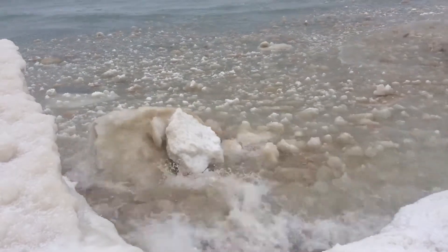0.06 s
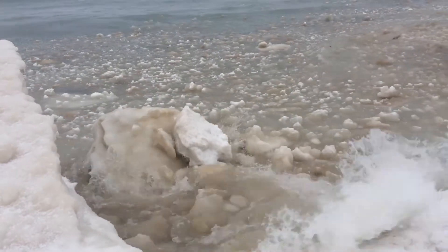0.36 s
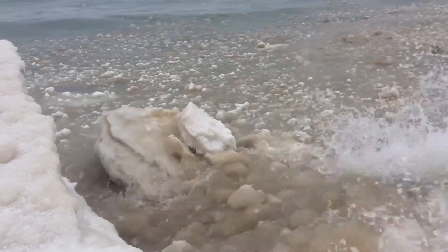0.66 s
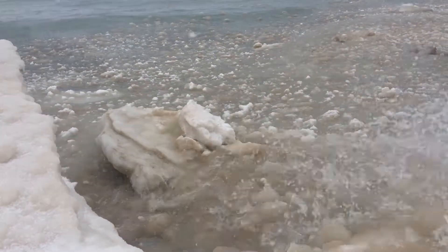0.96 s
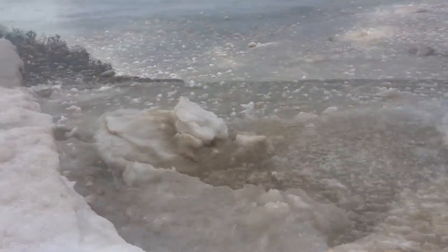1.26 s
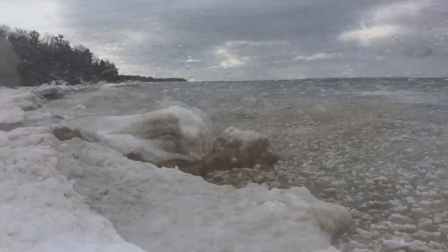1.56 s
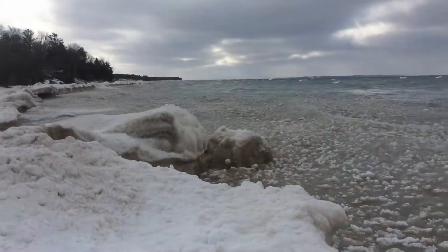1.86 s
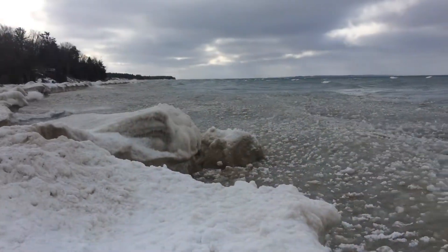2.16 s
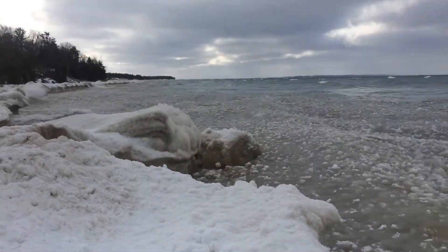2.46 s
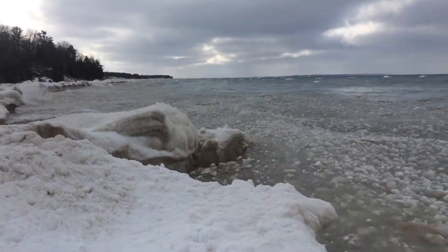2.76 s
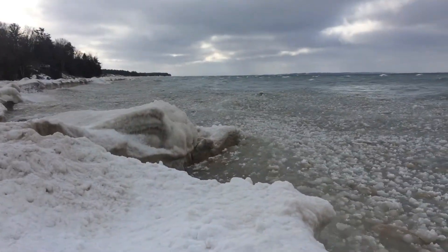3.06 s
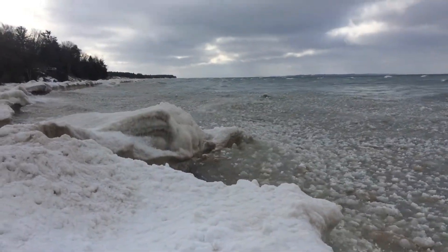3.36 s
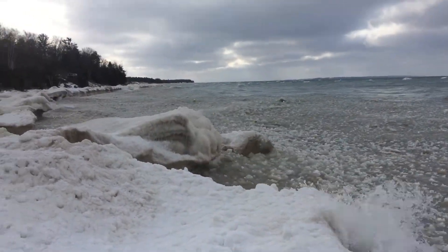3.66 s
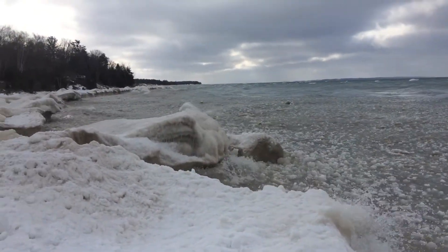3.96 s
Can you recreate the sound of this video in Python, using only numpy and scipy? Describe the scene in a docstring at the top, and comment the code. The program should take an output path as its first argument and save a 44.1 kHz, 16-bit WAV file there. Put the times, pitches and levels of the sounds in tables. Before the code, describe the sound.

A slushy wave breaks and splashes against ice, then wind buffets the microphone over softer surf.

```python
"""Slushy wave on an ice shelf

A wave breaks right below a hand-held microphone: bubbles churn, slush slaps and spray rains back.
It dies away to a duller wash from the open shore, with small splashes and fizz at the ice edge.
Gusts buffet the microphone, and a narrow, drifting dip hollows out the water's sound. Mono."""
import sys
import numpy as np
from scipy import signal
from scipy.fft import rfft, irfft
from scipy.io import wavfile
from scipy.ndimage import uniform_filter1d

SR = 44100
rng = np.random.default_rng(int(sys.argv[2]) if len(sys.argv) > 2 else 0)


def dump(signal):
    """Clip the signal to [-1, 1] and save it as 16-bit WAV at the path in sys.argv[1]."""
    limited = np.clip(np.atleast_2d(signal).T, -1, 1)
    pcm = np.round(limited * 32767).astype(np.int16)
    wavfile.write(sys.argv[1], SR, pcm)


N = 176400
TIME = np.arange(N) / SR


def amp(db):
    """Decibels to gain."""
    return 10 ** (np.asarray(db) / 20)


def unit(x):
    """Scales to rms 1."""
    return x / np.sqrt(np.mean(x ** 2) + 1e-20)


def fader(curve):
    """Turns (time_s, level_db) points into a gain for every sample."""
    return amp(np.interp(TIME, *np.transpose(curve)))


def equalise(x, tone):
    """Shapes a sound with an EQ curve of (frequency_hz, gain_db) points."""
    points_hz, gain_db = np.transpose(tone)
    hz = np.fft.rfftfreq(len(x), 1 / SR)
    return irfft(rfft(x) * amp(np.interp(np.log(hz + 1), np.log(points_hz), gain_db)), len(x))


def bell(hz, centre_hz, octaves):
    """A bump of height 1 on a log-frequency axis."""
    return np.exp(-.5 * (np.log2((hz + 1) / centre_hz) / octaves) ** 2)


def add(mix, start_s, sound):
    """Mixes a sound in at start_s."""
    part = mix[max(round(start_s * SR), 0):][:len(sound)]
    part += sound[:len(part)]


def wander(samples, span):
    """A smooth random drift of rms 1 that changes over about span samples."""
    return unit(uniform_filter1d(uniform_filter1d(rng.standard_normal(samples), span), span // 2))


def patchy_noise(depth_db):
    """Noise whose loudness wanders in small patches of time and frequency."""
    spectrum = signal.stft(rng.standard_normal(N), nperseg=512, noverlap=384)[2]
    along_time = uniform_filter1d(rng.standard_normal(spectrum.shape), 10, axis=1)
    patches = unit(uniform_filter1d(along_time, 8, axis=0))
    return unit(signal.istft(spectrum * amp(depth_db * patches), nperseg=512, noverlap=384)[1][:N])


def bubbles(per_s, low_hz, high_hz, decay_cycles, spread_db, pitches=30):
    """A random shower of bubbles or drops: short damped tones that rise a little."""
    out = np.zeros(N)
    for hz in np.geomspace(low_hz, high_hz, pitches):
        age = np.arange(int(5 * decay_cycles * SR / hz) + 2) / SR * hz / decay_cycles  # in decay times
        ring = np.exp(-age) * np.sin(2 * np.pi * decay_cycles * (age + age ** 2 / 50))
        hits = np.flatnonzero(rng.random(N) < per_s / pitches / SR)
        triggers = np.zeros(N)
        triggers[hits] = amp(spread_db * np.minimum(rng.standard_exponential(N)[hits], 4))
        out += hz * signal.oaconvolve(triggers, ring - ring.mean())[:N]
    return unit(out)


def water(curve, tone, wash, drops, drops_db, slosh_db=0.65):
    """An uneven rush of countless small bubbles, with single nearer ones standing out."""
    slosh = amp(slosh_db * wander(N, span=1100))
    return fader(curve) * slosh * unit(equalise(wash + amp(drops_db) * drops, tone))


# Swell of the close, churning water: time_s, level_db
CHURN_FADER = [(0, -28), (.33, -27), (.41, -29), (.52, -28), (.59, -31), (.66, -25.5), (.78, -26.5),
               (.93, -30.5), (1.05, -30.5), (1.3, -35.5), (1.65, -47)]
# Its full, low body: frequency_hz, gain_db
CHURN_EQ = [(25, -45), (75, -13), (150, 3.5), (300, -2.5), (600, -2.5), (1050, -0.5), (1450, -6.5),
            (1950, -3.5), (2800, -6), (4800, -18.5), (15000, -17.5)]
def churn():
    """The breaking wave churns against the ice, thick with bubbles."""
    wash = patchy_noise(depth_db=1.34)
    gurgle = bubbles(per_s=1300, low_hz=202.2, high_hz=4960, decay_cycles=6.2, spread_db=3.5)
    return water(CHURN_FADER, CHURN_EQ, wash, gurgle, drops_db=-13.5)


# Swell of the falling spray: time_s, level_db
SPRAY_FADER = [(0, -31), (.2, -39.5), (.6, -38.5), (.622, -31), (.88, -31), (1.04, -26.5), (1.25, -30),
               (1.4, -35), (1.57, -36), (1.72, -49.5)]
# Its thin, bright tone: frequency_hz, gain_db
SPRAY_EQ = [(100, -48), (500, -13.5), (1200, 0.5), (2000, 2), (2700, -3.5), (4300, -6), (6100, -4.5),
            (10000, -11.5), (15000, -14)]
def spray():
    """Thrown spray patters back down as a dense shower of tiny drops."""
    wash = patchy_noise(depth_db=0)
    patter = bubbles(per_s=4000, low_hz=878, high_hz=14850, decay_cycles=2.65, spread_db=2.5)
    return water(SPRAY_FADER, SPRAY_EQ, wash, patter, drops_db=-6)


def foam(level_db=-34.5, centre_hz=3100, drain_s=0.32):
    """Fine bubbles hiss as the foam of the previous wave drains away."""
    band = bell(np.fft.rfftfreq(N, 1 / SR), centre_hz, octaves=0.4)
    hiss = irfft(rfft(rng.standard_normal(N)) * band, N)
    return amp(level_db) * np.exp(-(TIME / drain_s) ** 2) * unit(hiss)


# Surges of fizzing slush: time_s, level_db
FIZZ_FADER = [(0, -36.5), (.45, -41), (1.1, -37), (1.5, -43), (1.8, -56), (2.05, -58), (2.15, -51.5),
              (2.4, -49.5), (2.6, -42.5), (2.71, -36), (2.85, -43), (3.1, -46), (3.42, -41), (3.57, -47.5),
              (3.65, -40.5), (3.85, -43), (4, -38.5)]
# Its crisp top end: frequency_hz, gain_db
FIZZ_EQ = [(300, -3.5), (1700, -4), (3600, 4), (4500, -1), (6000, 1.5), (7300, -4), (8700, -1.5),
           (10600, -6.5), (15000, -7.5)]
def fizz():
    """Slush fizzes along the ice edge, with a few bubbles popping far louder than the rest."""
    wash = patchy_noise(depth_db=1.5)
    crackle = bubbles(per_s=2200, low_hz=1590, high_hz=13100, decay_cycles=3, spread_db=9)
    return water(FIZZ_FADER, FIZZ_EQ, wash, crackle, drops_db=-11.5)


# Slow build of the surf along the shore: time_s, level_db
SURF_FADER = [(0, -57), (1.3, -44.5), (2.4, -40.5), (2.7, -34.5), (2.85, -41), (3.3, -36.5), (3.55, -38),
              (4, -40.5)]
# Its dull, distant tone: frequency_hz, gain_db
SURF_EQ = [(25, -16), (100, -4), (200, 6.5), (400, 2), (1000, -1.5), (1700, -3), (2800, -8), (6000, -14.5),
           (15000, -32)]
def surf():
    """Surf further off, its bubbles blending into a soft wash."""
    wash = patchy_noise(depth_db=1.5)
    burble = bubbles(per_s=970, low_hz=359, high_hz=3507, decay_cycles=8.8, spread_db=1)
    return water(SURF_FADER, SURF_EQ, wash, burble, drops_db=-13.5)


# Colour of wind pressure at the microphone port: frequency_hz, gain_db
WIND_EQ = [(25, -53), (52, 0), (150, 3), (270, -7), (520, 0.5), (850, -7.5)]
def turbulence(edge_hz, samples, edge_order=2.86, eddy_size_range=10.4):
    """Pressure noise in a band that rises with wind speed, coloured by the microphone port."""
    ratio = (np.fft.rfftfreq(samples, 1 / SR) + 1) / edge_hz
    band = 1 / np.sqrt((1 + ratio ** (2 * edge_order)) * (1 + (ratio * eddy_size_range) ** -2))
    noise = irfft(band * np.exp(2j * np.pi * rng.random(len(band))), samples)
    return unit(equalise(noise, WIND_EQ))


# Bed of light wind between the gusts: time_s, level_db
BREEZE_FADER = [(0, -53), (1.9, -47.5), (2.3, -41), (2.9, -35), (3.2, -52.5), (3.32, -33.5), (4, -43)]
def breeze(lumps_db=3):
    """Light wind on the microphone makes a low, lumpy rumble."""
    lumps = amp(lumps_db * wander(N, span=1000))
    return fader(BREEZE_FADER) * unit(lumps * turbulence(edge_hz=125, samples=N))


# Slush and flung drops hitting the water: start_s, peak_db, pitch_hz
SLAP_HITS = [(.526, -35, 1100), (0.614, -30, 5970), (.652, -17.5, 273), (0.72, -17, 1600),
             (.722, -22, 6000), (0.763, -17, 1580), (.768, -20.5, 340), (.902, -24, 390),
             (1.027, -18, 1160), (3.416, -27, 8400), (3.627, -32, 6450), (3.771, -27, 2260)]
def slaps(attack_s=0.0012):
    """Lumps of slush land with short, hollow splats."""
    out = np.zeros(N)
    t = np.arange(4096) / SR
    hz = np.fft.rfftfreq(len(t), 1 / SR)
    for start_s, peak_db, pitch_hz in SLAP_HITS:
        decay_s = 0.0065 / np.cbrt(pitch_hz / 1500)  # bigger, lower splats last longer
        splat = irfft(rfft(rng.standard_normal(len(t))) * bell(hz, pitch_hz, octaves=0.54))
        splat *= np.minimum(t / attack_s, 1) * np.exp(-t / decay_s)
        add(out, start_s, amp(peak_db) * splat / abs(splat).max())
    return out


# Sweep of the notch in the water's sound: time_s, centre_hz, depth_db
NOTCH_SWEEP = [(1, 2620, 4), (1.45, 2730, 6), (1.9, 2430, 10.5), (2.7, 2590, 9), (3.25, 2930, 5.5),
               (3.58, 3400, 11.5), (3.8, 3220, 6.5), (4, 3220, 13)]
def moving_notch(x):
    """A narrow dip drifting around 2.4-3.4 kHz hollows out the water's sound."""
    hz, t, spectrum = signal.stft(x, SR, nperseg=512)
    time_s, centre_hz, depth_db = np.transpose(NOTCH_SWEEP)
    notch = bell(hz[:, None], np.interp(t, time_s, centre_hz), octaves=0.22)
    cut_db = np.interp(t, time_s, depth_db) * notch
    return signal.istft(spectrum * amp(-cut_db), SR, nperseg=512)[1][:N]


# Eddies hitting the microphone: middle_s, length_s, level_db, upper_edge_hz
EDDY_HITS = [(1.378, 0.026, -27, 345), (1.836, 0.032, -37, 90), (1.619, 0.011, -37.5, 230),
             (2.021, 0.042, -43.5, 169), (2.148, 0.029, -23.5, 80), (2.207, 0.017, -17, 436),
             (2.247, 0.032, -22, 390), (2.289, 0.025, -28.5, 120), (2.359, 0.043, -29, 190),
             (2.442, 0.016, -34, 170), (2.525, 0.0055, -28, 750), (2.541, 0.014, -23, 223),
             (2.558, 0.0061, -21, 450), (2.643, 0.014, -24, 418), (2.686, 0.022, -24.5, 130),
             (2.715, 0.017, -20.5, 490), (2.757, 0.041, -28, 437), (2.89, 0.01, -19.5, 300),
             (2.971, 0.01, -34, 170), (3.024, 0.016, -31, 141), (3.328, 0.02, -23, 260),
             (3.358, 0.032, -20.5, 600), (3.411, 0.032, -17.5, 710), (3.453, 0.029, -19.5, 590),
             (3.477, 0.017, -29, 600), (3.541, 0.025, -18.5, 800), (3.576, 0.019, -20, 950),
             (3.602, 0.0085, -25, 646), (3.744, 0.0096, -22.5, 577), (3.811, 0.018, -29, 500),
             (3.859, 0.02, -29, 495), (3.969, 0.059, -21.5, 564)]
def buffets(squareness=1.98, flutter_db=2.3, samples=16384):
    """Each eddy thumps the microphone with a brief, fluttering swell of turbulence."""
    out = np.zeros(N)
    t = (np.arange(samples) - samples // 2) / SR
    for middle_s, length_s, level_db, edge_hz in EDDY_HITS:
        swell = np.exp(-.5 * abs(2 * t / length_s) ** squareness)
        flutter = amp(flutter_db * wander(samples, span=220))
        thump = unit(turbulence(edge_hz, samples) * flutter * swell)
        add(out, middle_s + t[0], amp(level_db) * thump * np.sqrt(np.mean(swell ** 2)))
    return out


# Sharp snaps inside the gusts: middle_s, peak_db, half_width_s
SNAP_HITS = [(1.866, -27, 0.0016), (2.099, -22.5, 0.00053), (2.151, -21, 0.00047), (2.212, -16, 0.00025),
             (2.2521, -18.5, 0.00028), (2.719, -19, 0.00062), (2.8874, -14.5, 0.0006),
             (3.374, -12, 0.00037), (3.4112, -8.5, 0.00036), (3.5395, -12, 0.00013), (3.571, -9, 0.0004),
             (3.943, -12.5, 0.00058)]
def snaps(samples=16384):
    """The strongest eddies snap: one fast swing of pressure, down and then up."""
    out = np.zeros(N)
    t = (np.arange(samples) - samples // 2) / SR
    for middle_s, peak_db, half_width_s in SNAP_HITS:
        swing = t / half_width_s
        add(out, middle_s + t[0], amp(peak_db) * swing * np.exp(.5 - .5 * swing ** 2))
    return out


def microphone_port(wind, edge_hz=2170):
    """The port rolls the top end off the wind noise."""
    return signal.sosfilt(signal.butter(6, edge_hz, fs=SR, output="sos"), wind)


def scene():
    """Water and wind, the same in both ears."""
    sea = moving_notch(churn() + spray() + foam() + slaps() + surf() + fizz())
    wind = microphone_port(breeze() + buffets() + snaps())
    mono = sea + wind
    return np.array([mono, mono])


def record(dry):
    """A steep high cut takes the very top off the mix."""
    cutoff_hz = 15400
    high_cut = signal.firwin(511, cutoff_hz, window=("kaiser", 9), fs=SR)
    return signal.oaconvolve(dry, high_cut[None], "same")


dry = scene()
out = record(dry)
dump(out)
```